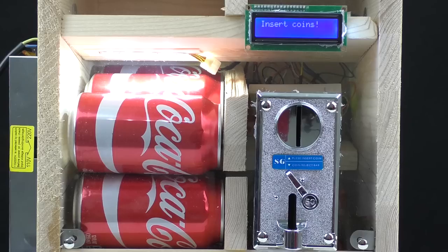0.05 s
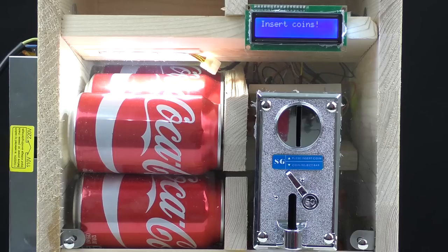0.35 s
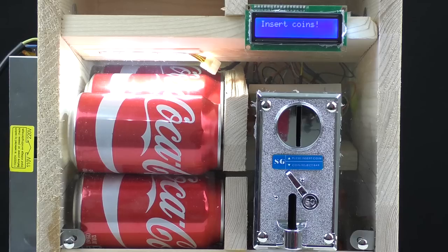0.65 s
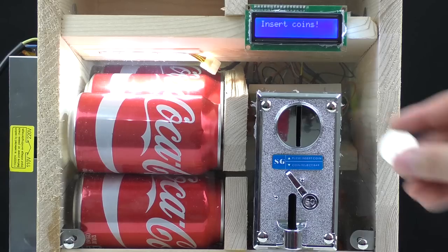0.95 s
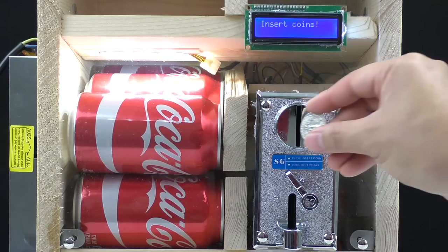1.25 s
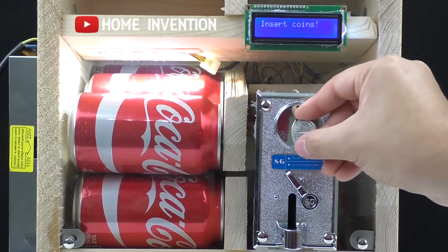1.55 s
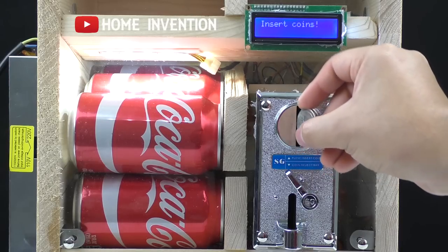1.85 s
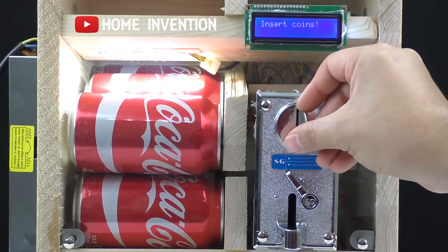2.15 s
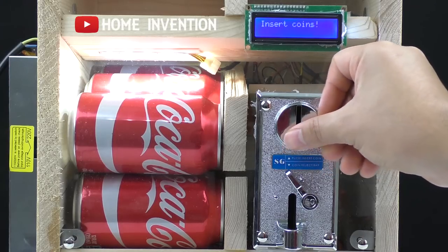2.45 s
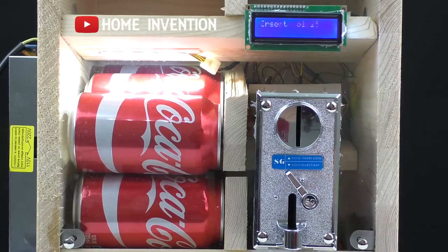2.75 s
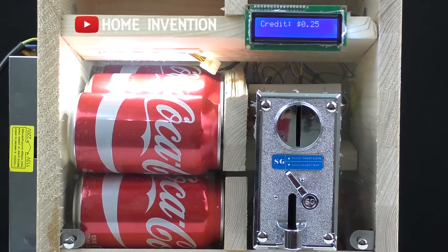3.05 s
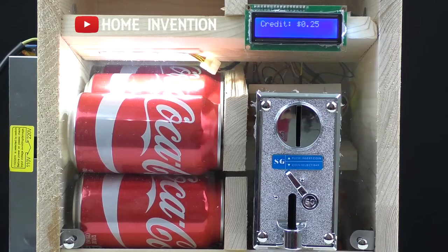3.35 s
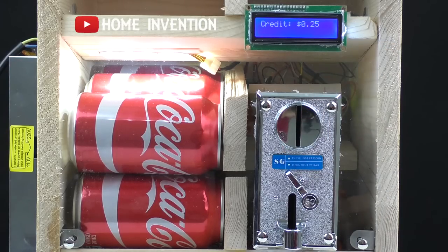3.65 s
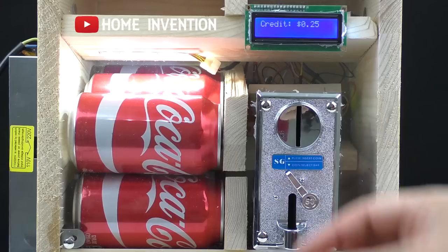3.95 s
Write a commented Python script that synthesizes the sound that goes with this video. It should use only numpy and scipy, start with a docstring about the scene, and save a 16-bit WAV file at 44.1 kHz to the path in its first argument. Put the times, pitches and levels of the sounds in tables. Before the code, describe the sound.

Close to a small indoor vending machine, a coin is inserted: a few dull taps, a short scrape, a quick metallic clatter inside, then lighter ringing bounces. A steady fan whirs underneath from start to finish.

```python
"""At a small wooden vending machine, stereo microphone close to the metal coin acceptor.
A power-supply fan hums and hisses from the first moment to the last. At 1.5 s a hand-held coin starts
tapping at the slot; from 2.3 s it is pushed in, the cabinet rumbles and the milled rim scrapes.
Let go near 2.7 s, the coin clacks down through the mechanism, and just after 3 s it drops into the
box below, where it bounces and rings to rest, leaving only the fan."""
import sys
import numpy as np
from scipy import signal
from scipy.fft import rfft, irfft
from scipy.io import wavfile
from scipy.ndimage import uniform_filter1d

SR = 44100
rng = np.random.default_rng(int(sys.argv[2]) if len(sys.argv) > 2 else 0)


def unload_wav(signal):
    """Save mono or channel-first audio to the path in sys.argv[1] as 16-bit WAV at rate SR, clipped to [-1, 1]."""
    wavfile.write(
        sys.argv[1],
        SR,
        np.round(np.clip(np.atleast_2d(signal).T, -1, 1) * 32767).astype(np.int16),
    )


N = 176400
HIT_SIZE = 2 ** 15  # samples in one impact
HIT_TIME = np.arange(HIT_SIZE) / SR


def amp(db):
    """Decibels to gain."""
    return 10 ** (np.asarray(db) / 20)


def grid(size):
    """Frequencies of a spectrum, Hz."""
    return np.maximum(np.fft.rfftfreq(size, 1 / SR), 1)


def curve(points, size):
    """Spread (f/Hz, gain/dB) points over a spectrum."""
    hz, db = np.array(points).T
    return np.interp(np.log(grid(size)), np.log(hz), db)


def colour(x, db):
    """Minimum-phase filter with the given gain at each frequency."""
    size = x.shape[-1]
    cepstrum = irfft(np.log(amp(db)), size)
    cepstrum[1:size // 2] *= 2
    cepstrum[size // 2 + 1:] = 0
    return irfft(rfft(x) * np.exp(rfft(cepstrum)), size)


def walk(rate):
    """Smooth random drift with unit spread, about `rate` new values a second."""
    span = int(SR / rate)
    steps = np.repeat(rng.standard_normal(N // span + 1), span)
    drift = uniform_filter1d(uniform_filter1d(steps, span), span)[:N]
    return drift / drift.std()


def envelope(points):
    """Gain through (t/s, level/dB) points, silent outside them."""
    return amp(np.interp(np.arange(N) / SR, *np.array(points).T, left=-120, right=-120))


def decay(t60, t=HIT_TIME):
    """A fall of 60 dB every t60 seconds."""
    return np.exp(-np.log(1000) * t / t60)


def mode(hz, t60):
    """One decaying vibration."""
    return np.sin(2 * np.pi * hz * HIT_TIME) * decay(t60)


def stereo(mid, side):
    """Left and right from mid and side."""
    return np.array([mid + side, mid - side])


def add(out, start, x):
    """Mix a sound in at `start` seconds."""
    i = int(start * SR)
    out[:, i:i + x.shape[-1]] += x[..., :out.shape[1] - i]


# strong harmonics of the fan shaft: multiple, level/dB
SHAFT_HARMONICS = [(12, -37.5), (14, -44.5), (15, -45), (16, -45.5)]
# thin motor whine: f/Hz, relative level/dB
MOTOR_WHINE = [(833, -51), (1319, -52.5), (1511, -54), (1653, -55), (1981, -49), (2126, -53.5),
               (2315, -52.5), (2643, -47.5), (2972, -51.5), (3187, -54), (3305, -57), (4253, -59),
               (4298, -64), (5949, -64.5)]
# colour of the rushing air: f/Hz, gain/dB
AIR_COLOUR = [(25, -21), (60, -11.5), (120, -4.5), (220, -3.5), (265, 2.5), (310, 5), (385, -0.5),
              (480, -5.5), (850, 1), (1200, -3.5), (2250, 2), (2900, -6), (3400, -2.5), (4300, -11.5),
              (5100, -9.5), (6700, -21), (10500, -22), (13000, -29), (15500, -33.5)]
# width of the air at the microphone: f/Hz, side to mid/dB
AIR_WIDTH = [(40, 0), (300, -11), (1000, -8), (3000, -5.5), (9000, -27.5), (15000, -0.5)]
SHAFT_HZ, SHAFT_WOBBLE, HUM_FLUTTER_DB, WHINE_FLUTTER_DB = 23.67, 0.001106, 1.33, 1.5
AIR_DB, AIR_FLICKER_DB = -38.5, 0.66


def fan():
    """The bed of the scene: shaft harmonics beat under a thin whine and the rush of air."""
    clock = np.cumsum(1 + SHAFT_WOBBLE * walk(5)) / SR
    tone = lambda hz, db: np.sqrt(2) * amp(db) * np.sin(2 * np.pi * (hz * clock + rng.random()))
    hum = sum(tone(k * SHAFT_HZ, db + HUM_FLUTTER_DB * walk(10)) for k, db in SHAFT_HARMONICS)
    whine = sum(tone(hz, db - 2.5 + WHINE_FLUTTER_DB * walk(14)) for hz, db in MOTOR_WHINE)
    mid, side = colour(rng.standard_normal((2, N)), curve(AIR_COLOUR, N))
    air = stereo(mid, colour(side, curve(AIR_WIDTH, N))) / mid.std()
    return hum + whine + air * amp(AIR_DB + AIR_FLICKER_DB * walk(15))


# resonances of the acceptor housing: f/Hz, width/Hz, strength/dB
HOUSING_RESONANCES = [(490, 28, 0), (683, 27, 3), (818, 30, 2.5), (1020, 120, 2), (1870, 66, 6),
                      (2435, 120, 9), (2623, 47, 5.5), (3070, 36, 8), (3860, 64, -7), (4800, 570, -4.5),
                      (5870, 110, 4), (8000, 180, -10)]


def housing(size):
    """Lift in dB where the metal housing resonates."""
    f = grid(size)
    power = sum(amp(db) ** 2 / (1 + (2 * (f - hz) / width) ** 2) for hz, width, db in HOUSING_RESONANCES)
    return 10 * np.log10(1 + power)


def contact(bass_db=0, knock_db=0, treble_db=0, knock_hz=1130, size=HIT_SIZE):
    """Colour in dB from where and how hard the coin lands."""
    f = grid(size)
    bass = 1 / (1 + (f / 655) ** 3)
    knock = np.exp(-(np.log2(f / knock_hz) / 0.44) ** 2)
    treble = 1 / (1 + (5950 / f) ** 3)
    return bass_db * bass + knock_db * knock + treble_db * treble


def metal_parts(count=110, low_hz=3010, high_hz=15870, mean_t60=.105):
    """High modes of the thin metal parts, a new mixture for each blow, as mid and side."""
    t = HIT_TIME[:HIT_SIZE // 4]
    chance = rng.random((count, 2))
    hz = low_hz + (high_hz - low_hz) * chance[:, :1]
    modes = np.sin(2 * np.pi * hz * t) * decay(mean_t60 * (.5 + chance[:, 1:]), t)
    mixture = rng.standard_normal((2, count)) @ modes * np.sqrt(2 / count)
    return np.pad(mixture, ((0, 0), (0, HIT_SIZE - len(t))))


def bending_waves(click, delay_s=0.00092, corner_hz=2520):
    """In a plate the lows arrive after the highs, smearing a click into a very short falling chirp."""
    size = len(click)
    delay = delay_s / (1 + grid(size) / corner_hz)
    phase = 2 * np.pi * np.cumsum(delay) * SR / size
    return irfft(rfft(click) * np.exp(-1j * phase), size)


# first echoes inside the cabinet: delay/s, level before dulling/dB
CABINET_ECHOES = [(.0013, -15), (.0031, -8)]
# width of an impact at the microphone: f/Hz, side to mid/dB
HIT_WIDTH = [(100, -20), (1000, -10.5), (4000, -8.5), (9000, -18), (14000, -1)]
RISE_S, DAMPING_HZ, TREBLE_T60_RATIO = 0.0008, 5200, 0.77
ECHO_DULL_HZ, ROOM_T60_S, ROOM_DB = 4000, 0.25, -19


def blow(t60, crack_share, parts_db):
    """One impact heard close: a crack with duller echoes, ringing body and parts, a faint room tail."""
    noise = rng.standard_normal((2, HIT_SIZE))
    low = signal.sosfiltfilt(signal.butter(2, DAMPING_HZ, fs=SR, output="sos"), noise)
    rise = 1 - np.exp(-HIT_TIME / RISE_S)
    ring = rise * decay(t60)
    treble_ring = rise * decay(t60 * TREBLE_T60_RATIO)
    body = low * ring + (noise - low) * treble_ring + amp(parts_db) * metal_parts()
    echoes = sum(amp(db) * (np.arange(HIT_SIZE) == int(lag * SR)) for lag, db in CABINET_ECHOES)
    dull_echoes = signal.sosfilt(signal.butter(1, ECHO_DULL_HZ, fs=SR, output="sos"), echoes)
    crack = (HIT_TIME == 0) + dull_echoes
    crack *= np.sqrt(crack_share * np.sum(ring ** 2) / np.sum(crack ** 2))
    room = amp(ROOM_DB) * (1 - np.exp(-HIT_TIME / 0.0041)) * decay(ROOM_T60_S)
    mid, side = np.sqrt(1 - crack_share) * body + room * rng.standard_normal((2, HIT_SIZE))
    return stereo(mid + bending_waves(crack), colour(side, curve(HIT_WIDTH, HIT_SIZE)))


# coin touching faceplate and slot: t/s, level/dB, knock f/Hz, knock/dB, treble/dB
SLOT_TAPS = [(1.502, -21.5, 1210, -2, 5), (1.509, -25.5, 1180, 9, -2), (1.918, -29.5, 930, 10, -8),
             (2, -23.5, 1190, 7.5, 13), (2.282, -17.5, 1070, 8, -1), (2.32, -12, 955, 3.5, 6.5),
             (2.334, -16, 950, 1, 0), (2.411, -28, 1020, 14.5, -16), (2.427, -15, 1000, -4, -19),
             (2.451, -14, 1010, -11, -5), (2.596, -21, 1150, 2, 5), (2.63, -18, 1000, -8, -14)]
# colour of the slot, tapped or scraped: f/Hz, gain/dB
SLOT_COLOUR = [(40, -42), (200, -2), (550, -6.5), (1000, 4), (2300, -2), (3800, -7.5), (6500, -17),
               (10000, -22.5), (15500, -36)]


def taps():
    """Right by the microphone, the coin, held between fingers, knocks dully against the slot."""
    out = np.zeros((2, N))
    body = curve(SLOT_COLOUR, HIT_SIZE) + housing(HIT_SIZE)
    for start, db, knock_hz, knock_db, treble_db in SLOT_TAPS:
        hit = blow(t60=0.048, crack_share=0.17, parts_db=-12.5)
        touch = contact(knock_db=knock_db, treble_db=treble_db, knock_hz=knock_hz)
        add(out, start, amp(db) * colour(hit, body + touch))
    return out


# swell of the cabinet's rumble: t/s, level/dB
RUMBLE_LEVEL = [(2.3, -48), (2.335, -38.5), (2.4, -50), (2.64, -53), (2.685, -45), (2.712, -29.5),
                (2.74, -36.5), (2.8, -46)]
# colour of the wooden cabinet: f/Hz, gain/dB
WOOD_COLOUR = [(90, -24), (180, -3), (265, -0.5), (340, 1.5), (520, -36), (2000, -77)]


def rumble():
    """Pushed in and rolling, the coin sets the wooden cabinet rumbling."""
    wood = colour(rng.standard_normal(N), curve(WOOD_COLOUR, N))
    return wood / wood.std() * envelope(RUMBLE_LEVEL)


# pressure of the coin along slot and rail: t/s, level/dB
SLIDE_PRESSURE = [(2.38, -35.5), (2.455, -29.5), (2.5, -35.5), (2.56, -33), (2.595, -27), (2.615, -27),
                  (2.66, -27), (2.72, -29), (2.745, -30), (2.785, -20.5), (2.82, -32), (2.87, -39),
                  (2.99, -30), (3.03, -46)]


def slide(grains_per_s=900, spread_db=2, side_db=-25):
    """The milled rim catches and slips, sending dense tiny clicks into the housing."""
    catches = rng.random((2, N)) < grains_per_s / SR
    clicks = catches * rng.choice([-1, 1], (2, N)) * amp(spread_db * rng.standard_normal((2, N)))
    mid, side = clicks / clicks.std() * envelope(SLIDE_PRESSURE)
    body = curve(SLOT_COLOUR, N) + housing(N) + contact(treble_db=1, size=N)
    return colour(stereo(mid, amp(side_db) * side), body)


# coin striking gate, rail and deflector:
# t/s, level/dB, bass/dB, knock/dB, treble/dB, crack share (0-1), t60/s
MECHANISM_STRIKES = [(2.666, -19, 0, -7, 1, 0, 0.071), (2.689, -29, 0, -16, 27, .3, 0.04),
                     (2.695, -16.5, 9, -1, 19.5, .2, .045), (2.7032, -16.5, 4.5, 9.5, 14.5, 0.04, 0.061),
                     (2.7525, -5, 8, -1, 0.5, 0.06, 0.031), (2.757, -7, -1, -2, 0, 0.06, 0.041),
                     (2.77, -9, 2, -1, 6.5, 0.13, 0.054), (2.7925, -2.5, 5, -2.5, -2.5, 0.99, 0.044),
                     (2.841, -22, -7, 12, -28, 0.25, 0.053), (2.8786, -16, 6, 11, -14, 0.15, 0.077),
                     (2.9116, -16, 3, 12, -23, 0.22, 0.045), (2.9252, -6, -13, -8, -2.5, 0.46, 0.058),
                     (2.976, -15, -12, 5, -10, 0.33, 0.058)]
# colour of the mechanism: f/Hz, gain/dB
MECHANISM_COLOUR = [(40, -31.5), (200, -4), (550, -4.5), (1000, -0.5), (2200, -3), (3600, -8.5),
                    (6800, -11), (8000, -16.5), (8900, -15.5), (10600, -12.5), (12800, -22.5), (15500, -24)]
# modes of the steel side plate: f/Hz, struck at the rail/dB, struck at the deflector/dB, t60/s
PLATE_MODES = [(1043, -14, -11.5, 0.059), (1940, -26, -12, 0.076), (2150, -22, -2.5, 0.041),
               (3200, -18.5, -26, 0.028), (3780, -17, -15.5, 0.053), (3964, -18, -11, 0.037),
               (5260, -28, -9.5, 0.039), (5960, -29.5, -34, 0.098)]
# free modes of the coin, heard in flight and later in the box: f/Hz, level/dB, t60 in the box/s
COIN_MODES = [(9400, -1, 0.051), (9500, -3.5, .04), (10330, -8, .05), (12750, -5, .05), (15290, 1, .04),
              (15560, -3, 0.045)]
LEAVES_RAIL_S, FLIGHT_RING_DB, FLIGHT_T60_RATIO = 2.85, -39, 6  # undamped in the air, it rings longer


def clacks():
    """Behind the faceplate the coin strikes its way down; sharp cracks wake the side plate."""
    out = np.zeros((2, N))
    body = curve(MECHANISM_COLOUR, HIT_SIZE) + housing(HIT_SIZE)
    at_rail = sum(amp(db) * mode(hz, t60) for hz, db, _, t60 in PLATE_MODES)
    at_deflector = sum(amp(db) * mode(hz, t60) for hz, _, db, t60 in PLATE_MODES)
    in_flight = sum(amp(db) * mode(hz, t60 * FLIGHT_T60_RATIO) for hz, db, t60 in COIN_MODES)
    for start, db, bass_db, knock_db, treble_db, crack_share, t60 in MECHANISM_STRIKES:
        hit = colour(blow(t60, crack_share, parts_db=-11), body + contact(bass_db, knock_db, treble_db))
        if start > LEAVES_RAIL_S:
            ring = crack_share * at_deflector + amp(FLIGHT_RING_DB) * in_flight
        else:
            ring = crack_share * at_rail
        add(out, start, amp(db) * (hit + ring))
    return out


# heavier blows among the clacks: t/s, f/Hz, level/dB, t60/s
CABINET_THUMPS = [(2.754, 330, -21.5, 0.1), (2.792, 106, -23.5, 0.024), (2.883, 567, -25, 0.079),
                  (2.899, 490, -26, 0.14)]


def thumps():
    """Each heavy blow shakes one low mode of the cabinet."""
    out = np.zeros((2, N))
    for start, hz, db, t60 in CABINET_THUMPS:
        add(out, start, amp(db) * mode(hz, t60))
    return out


def chatter(x, touches_per_s=780, t60=.14):
    """After a blow the rim touches again and again, ever more lightly, and roughens the sound."""
    touching = rng.random(HIT_SIZE) < touches_per_s / SR
    touches = (HIT_TIME == 0) + touching * rng.standard_normal(HIT_SIZE) * decay(t60)
    return irfft(rfft(x) * rfft(touches / np.linalg.norm(touches)), HIT_SIZE)


# coin landing in the box: t/s, level/dB, treble/dB, ring/dB
BOX_BOUNCES = [(3.0545, -26.5, -5, -3), (3.0617, -21.5, -17, -17), (3.082, -37, 4, -24),
               (3.137, -25, -1, -27), (3.152, -38, 12, -32), (3.18, -33, -6, -30),
               (3.216, -28.5, -0.5, -32), (3.248, -27.5, 5, -28), (3.285, -40.5, 6, -28),
               (3.549, -30.5, -4.5, -22)]
# colour of the box: f/Hz, gain/dB
BOX_COLOUR = [(40, -24), (600, -18), (2000, 8), (4000, -11), (6800, -4.5), (8300, -14), (10200, -5.5),
              (14000, -15), (15500, -17)]


def bounces(jingle_db=-6):
    """Down in the box the coin jingles to rest, each landing with a rough, high ring."""
    out = np.zeros((2, N))
    body = curve(BOX_COLOUR, HIT_SIZE)
    coin_ring = sum(amp(db) * mode(hz, t60) for hz, db, t60 in COIN_MODES)
    for start, db, treble_db, ring_db in BOX_BOUNCES:
        hit = colour(blow(t60=0.054, crack_share=0.033, parts_db=-3), body + contact(treble_db=treble_db))
        jingle = amp(jingle_db) * chatter(hit)
        ring = amp(ring_db) * chatter(coin_ring)
        add(out, start, amp(db) * (hit + jingle + ring))
    return out


def scene(left_db=0.45):
    """The coin's journey over the fan, a little left of the microphone's centre."""
    sound = fan() + taps() + rumble() + slide() + clacks() + thumps() + bounces()
    return sound * amp(np.array([[left_db], [-left_db]]) / 2)


def record(dry):
    """The sound begins after a moment of silence; the loudest peak clips and the top is cut."""
    start_s, top_hz = .0695, 15850
    live = np.clip(dry, -.9, .9) * (np.arange(N) / SR > start_s)
    return signal.sosfilt(signal.ellip(10, .2, 80, top_hz, fs=SR, output="sos"), live)


dry = scene()
out = record(dry)
unload_wav(out)
```